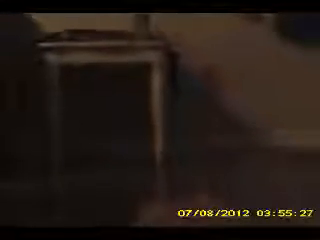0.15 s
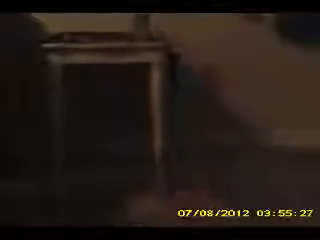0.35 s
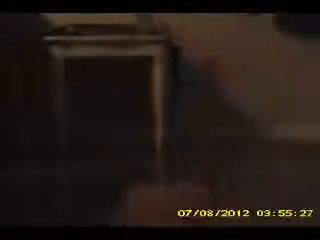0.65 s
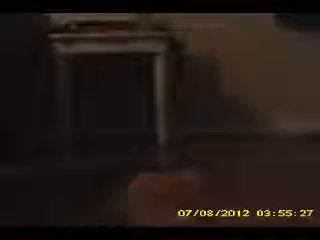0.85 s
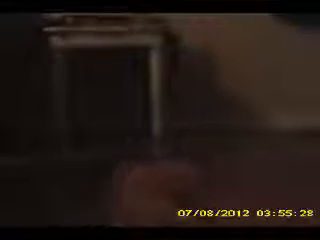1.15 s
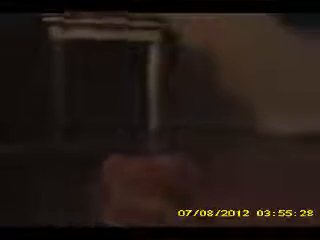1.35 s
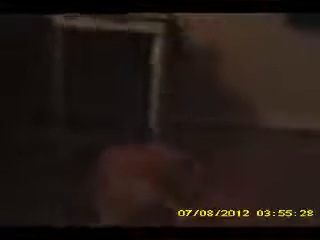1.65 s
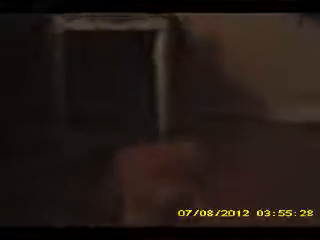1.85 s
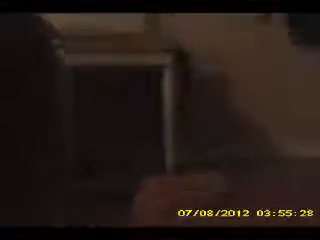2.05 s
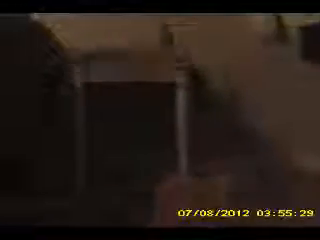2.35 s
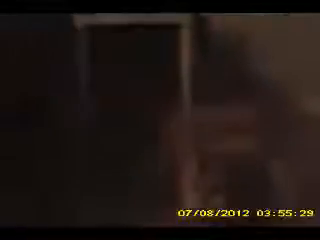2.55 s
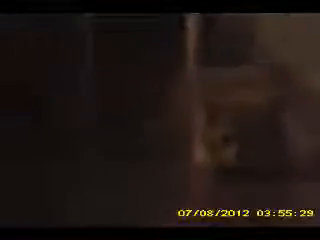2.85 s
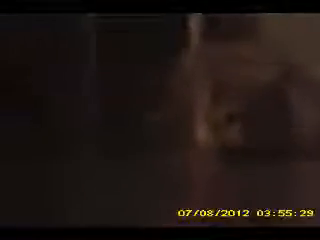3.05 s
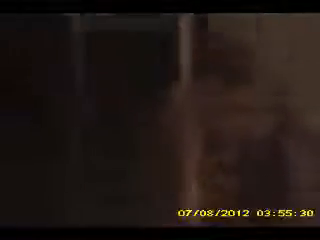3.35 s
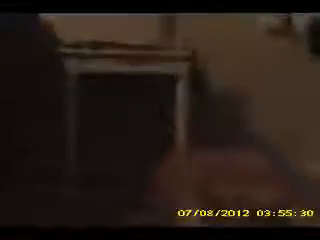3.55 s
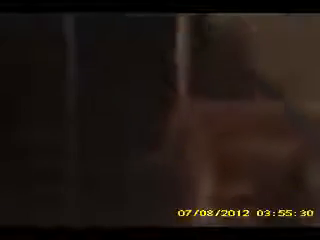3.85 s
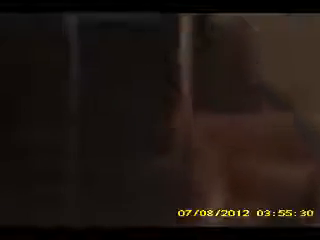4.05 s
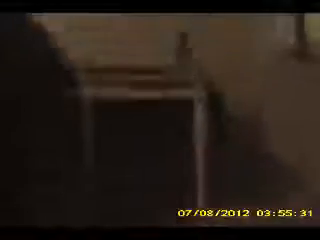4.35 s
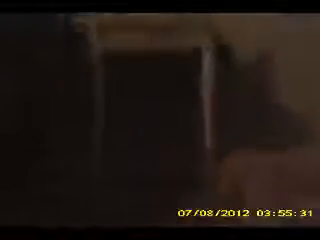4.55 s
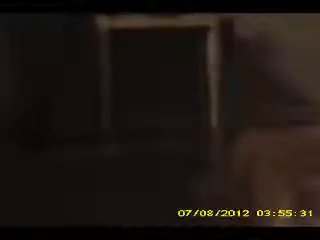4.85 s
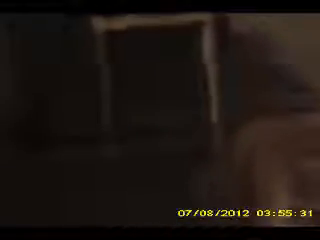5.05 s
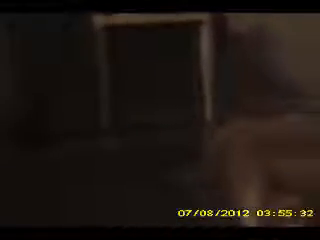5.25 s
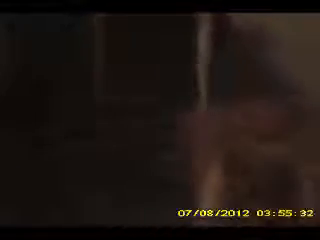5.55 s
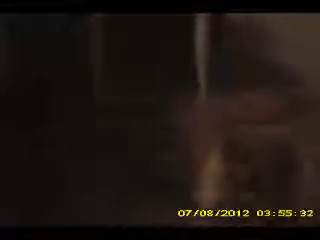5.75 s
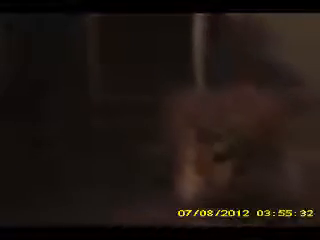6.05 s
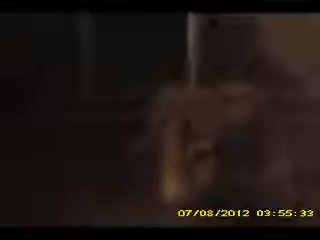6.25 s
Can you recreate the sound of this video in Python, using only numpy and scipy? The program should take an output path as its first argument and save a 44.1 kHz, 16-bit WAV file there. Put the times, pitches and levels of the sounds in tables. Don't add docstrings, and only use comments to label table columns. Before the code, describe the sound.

A tiny quadcopter flies in a room, with a cheap microphone fixed to its frame. Four propellers buzz together at slightly different, wobbling pitches, beating against one another. A steady high motor whistle and rough air turbulence fill the gaps. The pitch jumps briefly around three seconds, then settles and rises a little at the end. Everything is loud, crushed and dull on top, without pauses.

```python
import sys
import numpy as np
from scipy import signal
from scipy.io import wavfile
from scipy.ndimage import uniform_filter1d

SR = 44100
rng = np.random.default_rng(int(sys.argv[2]) if len(sys.argv) > 2 else 0)


def convert_level_to_amplitude(level_db):
    exponent = np.asarray(level_db, float) / 20
    return 10 ** exponent


def materialize(psi):
    bounded = np.clip(np.atleast_2d(psi).T, -1, 1)
    quanta = np.round(bounded * 32767).astype(np.int16)
    wavfile.write(sys.argv[1], SR, quanta)


N = 282328


def rms_one(x):
    return x / np.sqrt(np.mean(x ** 2) + 1e-20)


def in_time(rows):
    s, *columns = np.transpose(rows)
    return [np.interp(np.arange(N) / SR, s, column) for column in columns]


def drift(rate_hz):
    pole = np.exp(-2 * np.pi * rate_hz * 40 / SR)
    noise = rng.standard_normal(N // 40 + 2002)
    slow = signal.lfilter([1], [1, -2 * pole, pole ** 2], noise)[2000:]
    return np.interp(np.arange(N) / 40, np.arange(len(slow)), rms_one(slow))


def turning(hz):
    return 2 * np.pi * (np.cumsum(hz) / SR + rng.random())


def rotor(blade_hz, jitter_hz, chop, blade_db, below_db, above_db):
    # (multiple of shaft rate [-], level against the blade tone [dB])
    shaft_orders = [
        (1, -33.5),
        (2, 1.5),
        (3, -26.5),
        (4, -8.5),
        (6, -11),
    ]
    blade_hz = uniform_filter1d(blade_hz, size=1760, mode="nearest")
    shaft = turning(blade_hz / 2 + jitter_hz * drift(15.0))
    tones = 0
    for order, db in shaft_orders:
        start = 2 * np.pi * rng.random()
        tones = tones + convert_level_to_amplitude(blade_db + db) * np.cos(order * shaft + start)
    speed = blade_hz / blade_hz.mean()
    gusts = convert_level_to_amplitude(0.7 * drift(8.0)) * speed ** 2.5
    below = convert_level_to_amplitude(below_db) * np.cos(chop - shaft)
    above = convert_level_to_amplitude(above_db) * np.cos(chop + shaft)
    uneven = convert_level_to_amplitude(2.8 * drift(6.7))
    return np.sqrt(2) * (gusts * tones + uneven * (below + above))


def flight_control():
    # (time [s], throttle [Hz], roll trim [Hz], pitch trim [Hz], yaw trim [Hz])
    sticks = [(0.0, 585.8, 2.3, 20.7, 9.6), (0.57, 582.6, -4.0, 39.4, 10.4), (1.5, 580.8, -2.0, 39.2, 6.7),
              (2.16, 584.0, -7.6, 38.6, 3.2), (2.43, 581.2, -5.2, 48.7, 7.4),
              (2.94, 583.8, -3.8, 44.7, 7.0), (3.1, 604.5, 1.2, 52.8, 6.0), (3.21, 612.3, 0.4, 29.7, -1.2),
              (3.44, 590.5, 3.7, 15.6, -0.7), (3.89, 583.3, 2.9, 26.8, 5.3), (4.06, 597.8, 0.7, 16.8, -1.6),
              (4.16, 586.8, -0.8, 23.1, 3.4), (4.46, 582.3, 4.8, 32.8, 1.7), (4.56, 581.1, 0.1, 35.8, 7.4),
              (5.3, 581.4, 0.7, 36.2, 6.6), (5.81, 580.8, -1.7, 50.1, 7.9), (6.07, 594.4, 0.4, 46.7, 1.1),
              (6.4, 597.4, 4.3, 33.8, 6.8)]
    # (time [s], roll correction [Hz], pitch correction [Hz], yaw correction [Hz])
    jolts = [(0.19, 5.0, -5.0, -1.0), (0.31, 8.0, -4.0, -3.0), (0.47, 8.0, -5.0, 0.0),
             (0.54, 29.0, -6.0, 8.0), (0.7, 8.0, -2.0, 1.0), (1.15, 5.0, -3.0, -1.0),
             (1.34, 6.0, -3.0, -1.0), (1.51, -6.0, 6.0, -5.0), (1.62, 6.0, -7.0, -1.0),
             (1.72, -13.0, 0.0, -3.0), (1.88, -4.0, 3.0, 8.0), (2.06, 2.0, -1.0, 8.0),
             (2.36, 1.0, 0.0, -14.0), (2.69, 4.0, -2.0, 4.0), (2.91, 0.0, 7.0, -3.0), (3.18, 7.0, 1.0, 1.0),
             (3.31, -4.0, 0.0, 15.0), (3.6, 1.0, 1.0, -20.0), (3.7, 3.0, -1.0, 4.0),
             (3.92, -1.0, -3.0, -4.0), (4.2, -1.0, 0.0, 11.0), (4.47, -9.0, -5.0, -12.0),
             (4.83, 11.0, -1.0, 1.0), (5.09, -10.0, -1.0, -1.0), (5.32, -16.0, 1.0, -2.0),
             (5.48, 14.0, 2.0, 4.0), (5.61, -2.0, 3.0, 3.0), (5.81, -3.0, -1.0, -7.0),
             (6.1, 7.0, -5.0, -1.0), (6.29, 2.0, -4.0, -5.0)]
    mixer = [(1, 1, -1, 1), (1, -1, 1, 1), (1, 1, 1, -1), (1, -1, -1, -1)]
    wobble_hz, fade_s, eagerness = 4.5, 0.15, 1.12
    throttle, *trims = in_time(sticks)
    for s, *kicks_hz in jolts:
        since = np.maximum(np.arange(N) / SR - s, 0)
        ringing = eagerness * np.exp(-since / fade_s) * np.sin(2 * np.pi * wobble_hz * since)
        trims = trims + np.outer(kicks_hz, ringing)
    return np.array(mixer) @ [throttle, *trims]


def drive_chopping():
    # (time [s], rate [Hz])
    chopping_rate = [(0, 2022), (1.5, 2020.8), (3, 2020), (3.9, 2022), (4.5, 2020.5), (5.1, 2021.3),
                     (5.7, 2020.3), (6.4, 2021.4)]
    return turning(in_time(chopping_rate)[0])


def drive_whistle(chop):
    wave = np.cos(chop) + convert_level_to_amplitude(-26) * np.cos(3 * chop)
    return np.sqrt(2) * convert_level_to_amplitude(-1.5 + 0.89 * drift(10.0)) * wave


def roar(patchy_db):
    # (frequency [Hz], level [dB per Hz])
    roar_spectrum = [(20, -9), (100, -23.5), (280, -17.5), (500, -4.5), (900, -3.5), (1300, 8.5),
                     (1800, 8.5), (2200, 8.5), (2800, -11.5), (4000, -23), (7000, -29.5), (11000, -50)]
    hz, db = np.transpose(roar_spectrum)
    white = rng.standard_normal((2, N))
    together = drift(5.0)
    edges = 20 * 2 ** np.arange(0, 9.2, 1 / 3)
    out = 0
    for k, (low, high) in enumerate(zip(edges, edges[1:])):
        band_pass = signal.butter(2, [low, high], "band", fs=SR, output="sos")
        band = signal.sosfilt(band_pass, white[k % 2])
        level_db = np.interp(np.log(low * high) / 2, np.log(hz), db)
        flicker_db = patchy_db * (0.94 * together + drift(16.0))
        out = out + convert_level_to_amplitude(level_db + flicker_db) * band
    return convert_level_to_amplitude(-3) * rms_one(out)


def scene():
    # (blade tone [dB], drive tone minus shaft rate [dB], drive tone plus shaft rate [dB])
    rotor_levels = [
        (-5, -15, -24),
        (-5, -25, -29.5),
        (-10.5, -14.5, -18.5),
        (-34, -9.5, -14.5),
    ]
    shaft_jitter = [.4, .4, .6, 2.5]
    chop = drive_chopping()
    rotors = 0
    for blade_hz, jitter_hz, levels in zip(flight_control(), shaft_jitter, rotor_levels):
        rotors = rotors + rotor(blade_hz, jitter_hz, chop, *levels)
    return (rotors + drive_whistle(chop) + roar(patchy_db=-0.02))[None]


def overload(dry):
    overdrive_db, ceiling, knee = 11.5, 0.45, 4
    hot = dry * convert_level_to_amplitude(overdrive_db)
    return hot / (1 + np.abs(hot / ceiling) ** knee) ** (1 / knee)


def converter(flat):
    grit_db, hiss_db = -16.5, -58.5
    input_cut_hz, damping = 2047, 0.8
    slope = uniform_filter1d(np.abs(np.gradient(flat[0])), size=90)
    steps = rms_one(slope ** 0.5 * convert_level_to_amplitude(0.7 * drift(5.4)))
    grit, hiss = steps * rng.standard_normal((2, N))
    grit = signal.lfilter(*signal.butter(1, 1500, "high", fs=SR), grit)
    w = 2 * np.pi * input_cut_hz / SR
    poles = np.poly(np.exp(w * np.roots([1, 2 * damping, 1]))).real
    dull = signal.lfilter([poles.sum()], poles, flat + convert_level_to_amplitude(grit_db) * grit)
    dull = dull + convert_level_to_amplitude(hiss_db) * hiss
    coupled = signal.lfilter(*signal.butter(1, 29.9, "high", fs=SR), dull)
    held = 2 * coupled * (np.arange(N) % 2)
    return signal.sosfilt(signal.butter(18, 10380, fs=SR, output="sos"), held)


def thrifty_storage(x, hop=2048, top_hz=10750):
    # (frequency [Hz], step against the local level [dB])
    thrift_steps = [(500, -14.5), (2000, -7), (4000, -2), (7000, 5), (10000, 9)]
    n, k = np.arange(2 * hop), np.arange(int(top_hz / SR * 2 * hop))
    window = np.sin(np.pi * (n + 0.5) / (2 * hop))
    basis = np.cos(np.pi / hop * np.outer(k + 0.5, n + 0.5 + hop / 2)) * window
    blocks = np.pad(x[0], (hop, 2 * hop - N % hop)).reshape(-1, hop)
    lines = np.hstack([blocks[:-1], blocks[1:]]) @ basis.T
    hz = (k + 0.5) * SR / (2 * hop)
    level = uniform_filter1d(np.median(np.abs(lines), axis=0), size=25)
    level[hz > 10000] = level[hz > 10000][0]
    step_hz, step_db = np.transpose(thrift_steps)
    thrift_db = np.interp(np.log(hz), np.log(step_hz), step_db)
    uneven_db = rng.normal(0, 2, (len(lines), 32)).repeat(32, axis=1)[:, :len(k)]
    step = level * convert_level_to_amplitude(thrift_db + uneven_db)
    rounded = np.sign(lines) * np.floor(np.abs(lines) / step + 0.4) * step
    back = rounded @ basis * 2 / hop
    return (back[:-1, hop:] + back[1:, :hop]).reshape(1, -1)[:, :N]


def top_cut(x):
    return signal.sosfilt(signal.butter(12, 11060, fs=SR, output="sos"), x)


def record(dry):
    finished = thrifty_storage(converter(overload(dry)))
    return top_cut(finished)


dry = scene()
out = record(dry)
materialize(out)
```